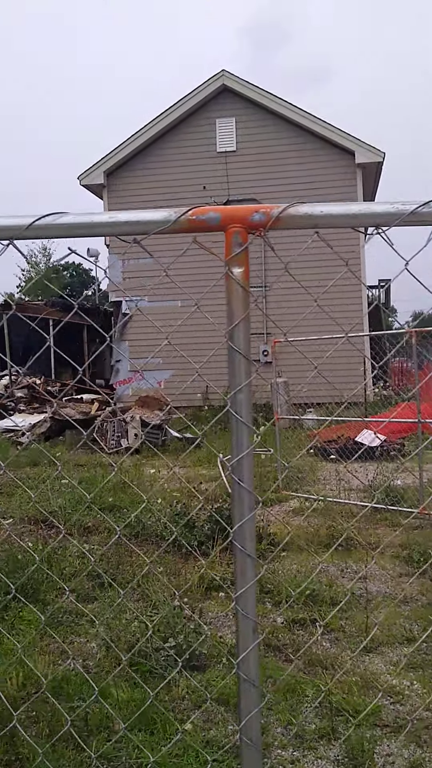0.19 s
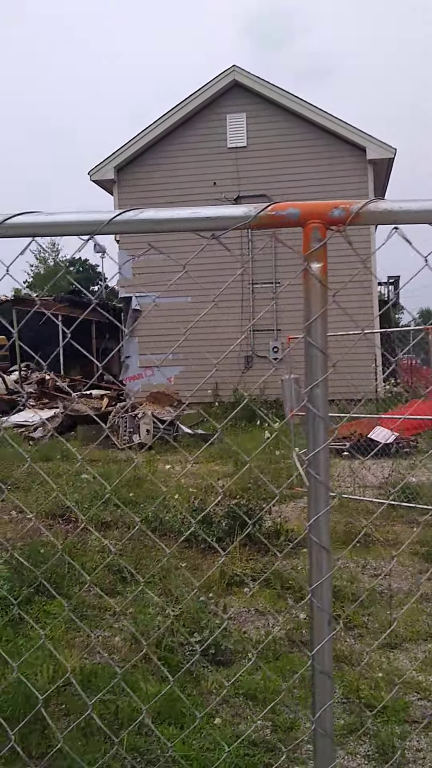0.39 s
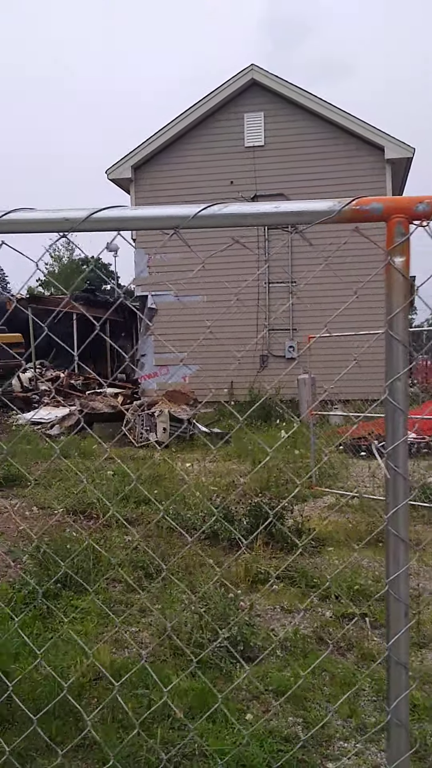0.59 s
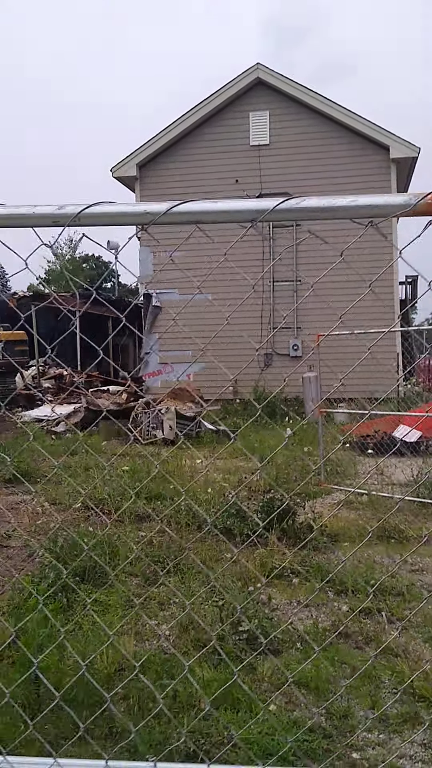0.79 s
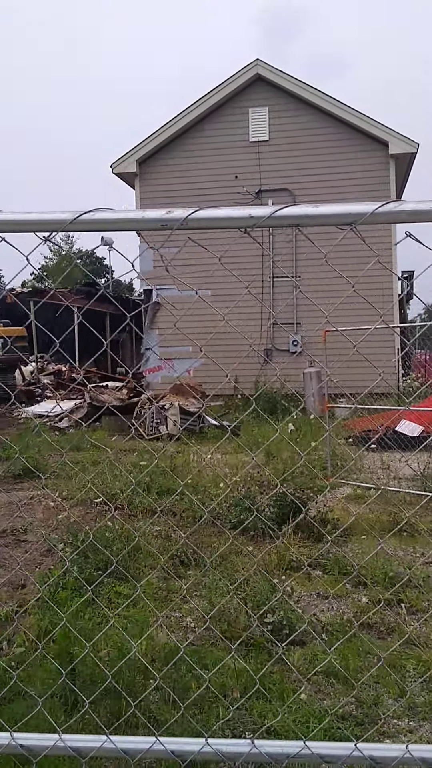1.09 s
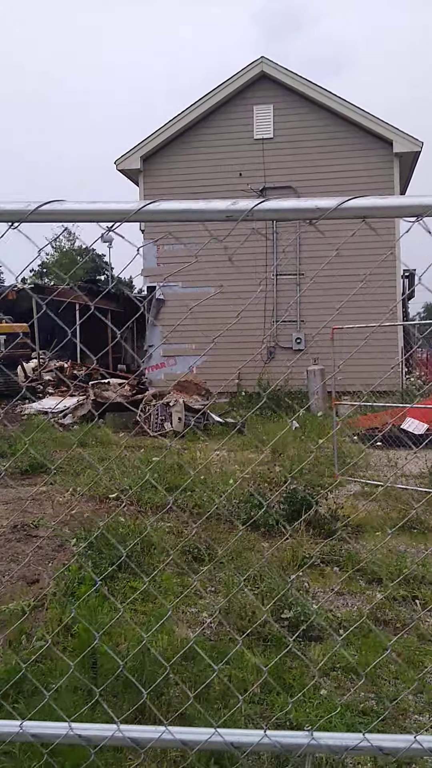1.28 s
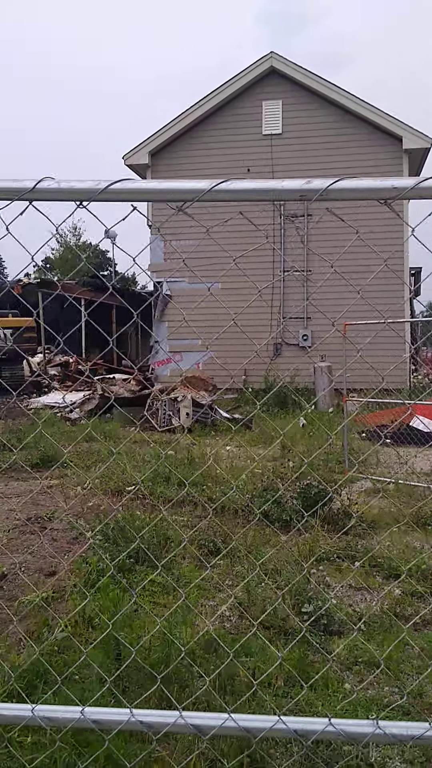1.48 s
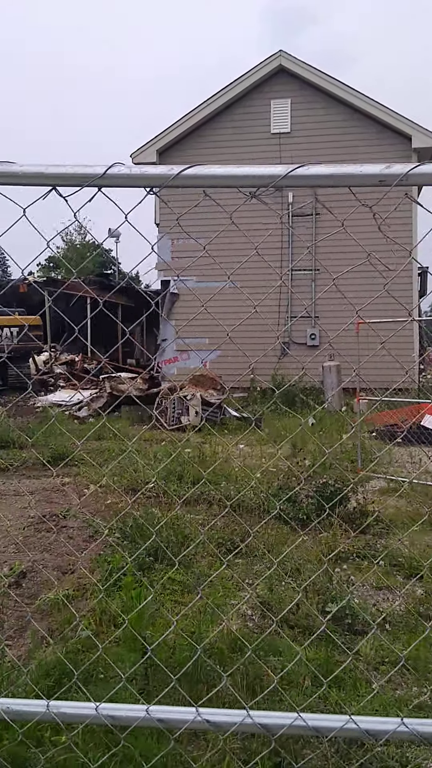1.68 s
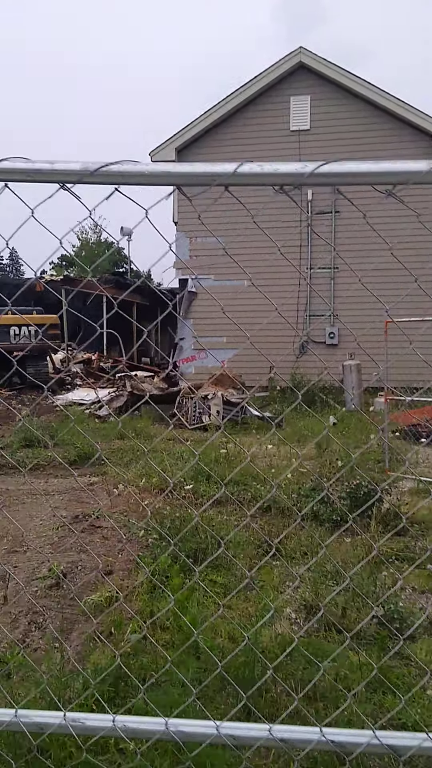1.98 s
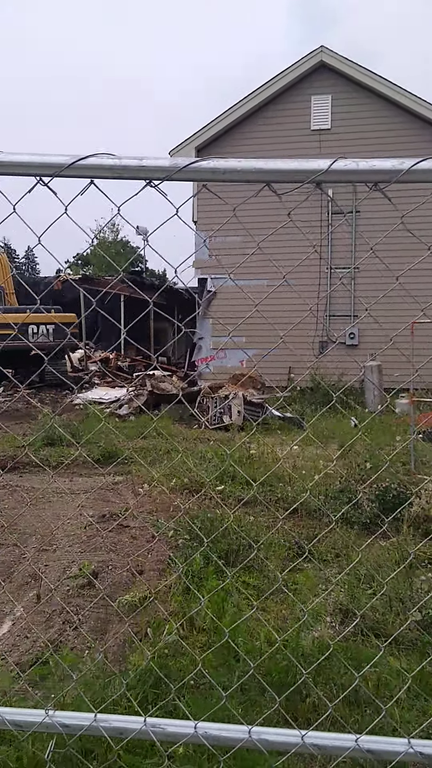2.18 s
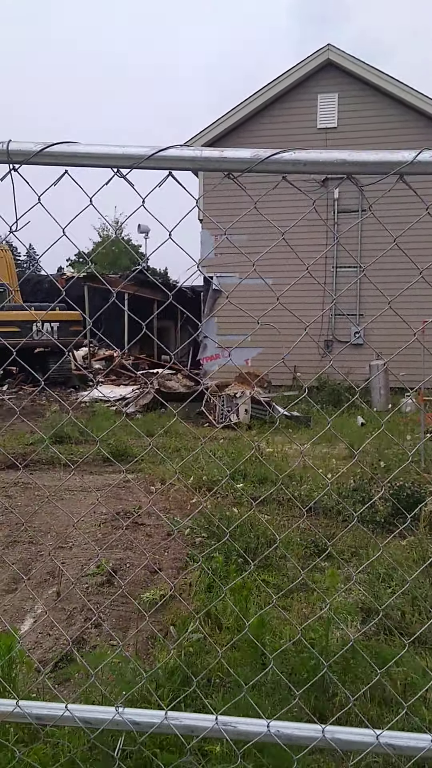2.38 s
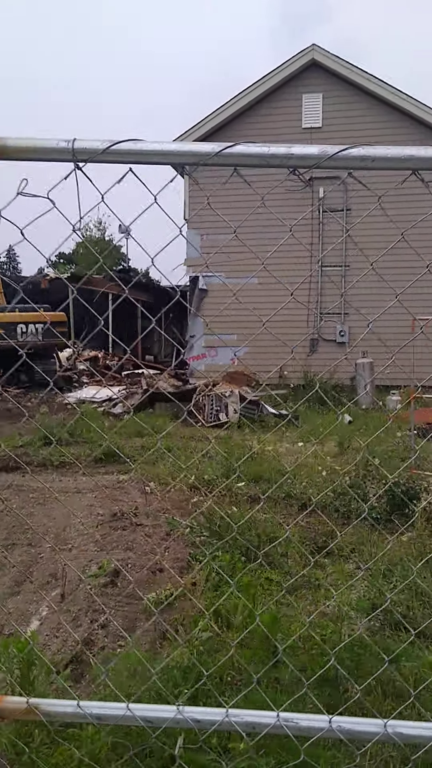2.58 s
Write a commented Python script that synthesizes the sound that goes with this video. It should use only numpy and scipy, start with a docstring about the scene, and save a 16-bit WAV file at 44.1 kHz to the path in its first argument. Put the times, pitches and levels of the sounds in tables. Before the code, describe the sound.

Wooden rubble crunches and slides from about 0.2 seconds, with sharp knocks around 0.8. At 1.2 a quick run of blows on a panel makes one hollow thud, followed by bright crackling and a few pings until 1.7. After a brief lull, more debris clatters from 2.0 to 2.8, each burst echoing briefly. A distant excavator's low diesel hum and a faint outdoor rumble and hiss continue throughout.

```python
"""An open yard, heard through a small two-port microphone; a diesel excavator hums in the distance.
Loose rubble crunches, slides and clatters: dense grains of impact ring in the pieces, and short,
shifting rings colour the crunch. One hollow thud, a quick run of blows on a panel, stands out with
a few knocks and pings from single pieces. Walls and ground return a short echo of the debris.
Under it all lies a steady outdoor rumble and hiss."""
import sys
import numpy as np
from scipy import signal
from scipy.fft import rfft, irfft
from scipy.io import wavfile
from scipy.ndimage import uniform_filter1d

SR = 44100
rng = np.random.default_rng(int(sys.argv[2]) if len(sys.argv) > 2 else 0)


def to_wav(sig):
    """Store sig (one row per channel, or 1-D mono) as 16-bit WAV at the path in sys.argv[1].

    Samples outside -1..1 are clipped; the rate is SR.
    """
    pcm = np.clip(np.atleast_2d(sig), -1, 1) * 32767
    pcm = np.round(pcm).astype(np.int16)
    wavfile.write(sys.argv[1], SR, pcm.T)  # frames by channels


N = 121275


def gain_of(db):
    """Decibels to amplitude gain."""
    return 10 ** (np.asarray(db) / 20)


def unit_rms(x):
    """Scales to rms 1."""
    return x / np.sqrt(np.mean(x ** 2) + 1e-20)


def curve_at(points, hz):
    """Reads (f/Hz, value) points on a log-frequency axis."""
    f, value = np.transpose(points)
    return np.interp(np.log(hz + 1), np.log(f + 1), value)


def high_pass(x, hz):
    """Rolls off the bass below hz."""
    return signal.sosfilt(signal.butter(3, hz, "high", fs=SR, output="sos"), x)


def drift(top_hz, points, length=N):
    """Random wander of rms about 1: sines up to top_hz, drawn on `points` steps, stretched to length."""
    t = np.arange(points) * N / SR / points
    rates = np.geomspace(top_hz / 10, top_hz, num=20)
    wander = unit_rms(sum(np.sin(2 * np.pi * (f * t + rng.random())) / np.sqrt(f) for f in rates))
    return np.interp(np.arange(length), np.linspace(0, length - 1, points), wander)


def microphone_ports(a, b, hz, likeness, balance):
    """Mixes two unrelated spectra into partly alike left and right ports; the right hears later."""
    lag_s = .00008
    shared = np.clip(curve_at(likeness, hz), 0, 1)
    side = gain_of(curve_at(balance, hz) / 2)
    left = a * side * np.exp(2j * np.pi * hz * lag_s)
    right = (shared * a + np.sqrt(1 - shared ** 2) * b) / side
    return np.array([left, right]) * 2 / (side + 1 / side)


def background_air():
    """Steady outdoor rumble and hiss, with a 2 kHz microphone resonance on the right."""
    # spectrum of the noise floor: f/Hz, relative level/dB
    spectrum = [(30, -9), (45, -32), (85, -14.5), (140, -6), (250, -8), (290, -16), (520, -24.5),
                (760, -15), (1000, -24.5), (1490, -19.5), (1700, -18.5), (1900, -1.5), (2300, -9),
                (2600, -34.5), (3440, -32), (4750, -38), (7700, -36.5), (10000, -35.5), (14000, -43),
                (15500, -43)]
    # likeness of the ports: f/Hz, coherence
    likeness = [(60, 1.0), (180, 1), (550, 1), (1650, 0.55), (4970, 0.02), (15000, 0.05)]
    # balance: f/Hz, left over right/dB
    balance = [(60, -6.5), (120, 8.5), (240, 1.5), (480, 6), (950, -1.5), (1890, -30.5), (3770, -4),
               (7520, 1.5), (15000, 8)]
    level_db, patch_db, swell_db = -50, 2.5, .6
    frames, hz = N // 256 + 5, np.fft.rfftfreq(1024, 1 / SR)
    a, b, c, d, patches = rng.standard_normal((5, frames, 513))
    patches = unit_rms(uniform_filter1d(uniform_filter1d(patches, size=10, axis=0), size=10, axis=1))
    swell = drift(5.46, frames, length=frames)[:, None]
    noise = microphone_ports(a + 1j * b, c + 1j * d, hz, likeness, balance)
    noise *= gain_of(curve_at(spectrum, hz) + patch_db * patches + swell_db * swell)
    air = signal.istft(noise.transpose(0, 2, 1), nperseg=1024, noverlap=768)[1][:, :N]
    return gain_of(level_db) * unit_rms(air)


def excavator_hum():
    """The distant diesel: low tones of steady level, each wavering slightly in pitch."""
    # engine tones: f/Hz, rms level/dB
    tones = [(59.2, -62.5), (101.5, -61), (118, -64.5), (170, -70), (200.5, -64.5), (235, -75),
             (252.5, -69), (469, -78)]
    waver_share, hum = .0061, 0
    for hz, db in tones:
        pitch_hz = hz * (1 + waver_share * drift(16, points=600))
        cycles = np.cumsum(pitch_hz) / SR + rng.random()
        hum += np.sqrt(2) * gain_of(db) * np.sin(2 * np.pi * cycles)
    return hum


def yard_echo(x):
    """Echoes off walls and ground: sparse taps, each band dying at its own speed; little bass returns."""
    # decay of the yard: f/Hz, t60/s
    decay = [(300, 0.18), (1500, 0.59), (5000, 0.59), (14000, 0.21)]
    echo_db = -12.5
    taps = np.zeros((2, SR))
    arrivals = np.arange(400, SR - 20, 20) + rng.integers(0, 20, (2, (SR - 401) // 20))
    np.put_along_axis(taps, arrivals, rng.choice([-1., 1.], arrivals.shape), 1)
    hz, t, spectra = signal.stft(taps, SR, nperseg=256)
    tail = signal.istft(spectra * gain_of(-60 * t / curve_at(decay, hz)[:, None]), SR, nperseg=256)[1]
    tail /= np.linalg.norm(tail[0])
    return gain_of(echo_db) * signal.fftconvolve(high_pass(x, hz=350), tail, axes=1)[:, :N]


def struck_mode(start_s, db, hz, t60, rise_s, shimmer=0):
    """One dying mode; any shimmer in its level grows over the first 25 ms."""
    t = np.maximum(np.arange(N) / SR - start_s, 0)
    attack = np.sin(np.pi / 2 * np.minimum(t / rise_s, 1)) ** 2
    flutter = 1 + shimmer * np.minimum(t / .025, 1)
    return gain_of(db - 60 * t / t60) * attack * flutter * np.sin(2 * np.pi * hz * t)


def pings():
    """Single struck pieces ring and shimmer as they die."""
    # ringing pieces: t/s, level/dB, f/Hz, t60/s
    strikes = [(0.004, -64, 3980, 0.2), (0.046, -51.5, 4300, 0.15), (0.055, -55.5, 6500, 0.078),
               (0.678, -47.5, 538, 0.17), (0.54, -52, 4300, 0.12), (0.79, -32.5, 2240, 0.054),
               (0.79, -47, 4250, 0.068), (0.793, -32.5, 1690, 0.074), (0.816, -32.5, 3900, 0.024),
               (0.817, -30, 1840, 0.045), (0.88, -58, 3110, 0.51), (0.902, -53, 3110, 0.3),
               (0.9, -34, 1733, 0.1), (0.901, -38, 4050, 0.023), (0.936, -65, 9550, 0.42),
               (0.968, -49.5, 3120, 0.067), (1.354, -43, 2076, 0.65), (1.4, -41, 1304, 0.32),
               (1.42, -50.5, 537, 0.15), (1.537, -24, 6550, 0.033), (1.577, -43.5, 556, 0.067),
               (2.017, -37.5, 2110, 0.064), (2.018, -48, 3530, 0.063), (2.038, -42, 2056, 0.03),
               (2.07, -60, 4800, 0.035), (2.071, -42, 2940, 0.074), (2.214, -29.5, 1025, 0.097),
               (2.218, -33, 2880, 0.048), (2.38, -49, 1008, 0.2), (2.422, -24.5, 3390, 0.031),
               (2.422, -28, 2543, 0.031), (2.462, -33.5, 599, 0.15), (2.463, -34.5, 693, 0.13),
               (2.465, -38.5, 801, 0.12), (2.644, -42.5, 980, 0.1)]
    shimmer = .7 * drift(140, points=2000)
    return sum(struck_mode(*strike, rise_s=.0025, shimmer=shimmer) for strike in strikes)


def panel_thud():
    """Quick blows ring the modes of a hollow panel, which radiates little bass."""
    # blows: t/s, level/dB
    blows = [(1.1665, -26), (1.192, -29), (1.2175, -45), (1.289, -50)]
    # panel modes: f/Hz, relative level/dB, t60/s
    modes = [(163, -9, .1), (196, 2.5, .11), (474, -3, .14), (548, -13, .28)]
    thud = sum(struck_mode(start_s, db + mode_db, hz, t60, rise_s=.005)
               for start_s, db in blows for hz, mode_db, t60 in modes)
    return high_pass(thud, hz=140)


def clatter_power():
    """Power in the six rubble bands as pieces land: a fast rise, then each band's own decay."""
    # clatters: t/s, level/dB, offsets/dB of the low, woody, body, edge, fizz and top bands, base t60/s
    clatters = [(0.0044, -40, -36, -24, -10, -15, -26.5, -22, 0.77),
                (0.233, -36, -30, -10.5, -7.5, -32, -21, -25, 0.56),
                (0.238, -27, -30, -19.5, -11, -27, -29, -36, 0.52),
                (0.2731, -31, -19, -28, -11, -29, -31, -23, 0.3),
                (0.3004, -19.5, -24, -14, -11.5, -23, -17, -18.5, 0.31),
                (0.3224, -23, -25, -17, -13, -13, -20, -19.5, 0.47),
                (0.411, -26.5, -27, -10, -15, -16, -24, -21, 0.41),
                (0.5148, -27.5, -33, -23, -13.5, -10.5, -15.5, -20, 0.71),
                (0.6234, -24, -40, -37, -15, -10, -20.5, -35, 0.21),
                (0.79, -31, -35.5, -31, -12, -23, -49, -65, 0.24),
                (0.816, -33, -56, -18, -12, -12, -50, -53, 0.32),
                (0.849, -44.5, -39, -21, -9.5, -15, -44, -43, 0.67),
                (0.9016, -33.5, -40, -20, -22.5, -15, -32.5, -39, 0.18),
                (1.1657, -30.5, -16, -40, -21.5, -10.5, -5.5, -4, 0.18),
                (1.1815, -27.5, -18, -21, -10, -10, -17, -20, 0.46),
                (1.207, -26.5, -29, -8, -12, -31, -16, -18, 0.18),
                (1.26, -28, -22, -22, -20, -16.5, -15.5, -6.5, 0.29),
                (1.352, -24.5, -44, -47, -24, -14, -15, -14, 0.16),
                (1.389, -34.5, -36, -36, -44, -14.5, -8, -16, 0.45),
                (1.468, -33.5, -39, -50, -41, -34, -9.5, -6.5, 0.49),
                (1.518, -26.5, -39, -29, -12, -12, -8.5, -11.5, 0.24),
                (1.5352, -25.5, -51, -12.5, -8, -37, -10, -26, 0.3),
                (1.5664, -22.5, -41.5, -23, -13, -18, -19, -30, 0.36),
                (1.6136, -21, -40, -25, -11.5, -5.5, -10.5, -28, 0.061),
                (1.64, -30.5, -44, -31, -12, -16.5, -23.5, -52, 0.65),
                (1.808, -42, -48, -23, -5.5, -38, -48, -34, 0.33),
                (2.0138, -39.5, -37, -34, -21, -7.5, -37, -40, 0.58),
                (2.069, -46.5, -39, -39, -15, -11.5, -29, -33, 1),
                (2.1855, -29.5, -42, -25.5, -12.5, -7.5, -20, -45, 0.39),
                (2.212, -22.5, -52, -21, -10, -7, -24, -54, 0.15),
                (2.366, -35.5, -31.5, -18, -19, -7.5, -34, -48, 0.14),
                (2.4197, -30.5, -50, -33, -11.5, -8, -13.5, -27, 0.14),
                (2.4607, -36, -28, -15, -3.5, -9, -14, -24, 0.12),
                (2.4855, -43, -31, -22, -14, -2.5, -31, -30, 0.36),
                (2.644, -37.5, -44, -32, -5.5, -19, -13, -24, 0.19),
                (2.7403, -37, -38, -17, -4.5, -11, -39, -48, 0.17)]
    rise_s, t60_share = .005, np.c_[[.44, .29, .58, .27, .44, .36]]
    power = np.zeros((6, N))
    for start_s, db, *bands_db, t60 in clatters:
        first = round(start_s * SR)
        span = np.arange(first, min(first + SR // 2, N))
        age = np.maximum(span / SR - start_s, 0)
        fall_db = db + np.c_[bands_db] - 60 * age / (t60 * t60_share)
        power[:, span] += (np.minimum(age / rise_s, 1) * gain_of(fall_db)) ** 2
    return power


def slide_power():
    """Power in the rubble bands as the heap slides between clatters; the low band stays empty."""
    # one path per slide: t/s, body level/dB, offsets/dB of the woody, edge, fizz and top bands
    slides = [
        [(0.21, -68, -34, -30, -18, -16), (0.228, -52, -11, 0.5, 1.5, 0), (0.318, -52.5, 17, 12, 4.5, -8),
         (0.4, -39, -10, -5, -4, -7.5), (0.648, -54.5, -5, 3, -7.5, -30), (0.788, -58, -37, -32, -44, -49)],
        [(1.17, -56, -3, 8.5, 1.5, -4), (1.352, -50, -18, -11.5, -4, -5.5), (1.506, -55, -40, -4, 3.5, 8),
         (1.536, -49, 9.5, 9, 7, 7), (1.742, -60, -33, -7.5, -25, -32), (1.934, -59, -33, -10, -29, -33),
         (1.95, -70, -13, -37, -33, -40)],
        [(2.18, -52.5, -22, 4, -10, -14), (2.204, -50.5, -1, 3, -8.5, -18.5),
         (2.366, -52, -23, -17, -29.5, -25.5), (2.462, -55.5, -10, 11, -0.5, -40),
         (2.616, -59.5, -33, -7.5, -32, -28), (2.64, -58.5, -0.5, 6.5, -7.5, 0.5),
         (2.74, -66, -21, -3, -16, -33)],
    ]
    t, power = np.arange(N) / SR, np.zeros((6, N))
    for slide in slides:
        times, body_db, woody_db, *upper_db = np.transpose(slide)
        for band, offset_db in enumerate([woody_db, 0, *upper_db], start=1):
            power[band] += gain_of(np.interp(t, times, body_db + offset_db, left=-120, right=-120)) ** 2
    return power


def grains():
    """Tiny impacts of random size and sign, bunching into louder clumps."""
    per_second, spread_db, clump_db = 5000, 3, 1.9
    size = gain_of(spread_db * np.minimum(rng.exponential(1, (2, N)), 3.5))
    hits = rng.random((2, N)) < per_second / SR
    clicks = unit_rms(size * hits * rng.choice([-1., 1.], (2, N)))
    return clicks * gain_of(clump_db * drift(70, points=2000))


def shifting_rings(crunch, sets=13):
    """Short, randomly pitched rings that keep changing and colour the crunch."""
    turn_s, mean_t60_s = .035, .038
    bare_db, ring_db, spread_db = -7, 2.5, 3
    t, turn, ringing = np.arange(4000) / SR, np.arange(N) / SR / turn_s, 0
    for k in range(sets):
        place, size, life = rng.random((3, 55, 1))  # 55 rings a set
        hz = 350 + 14650 * place ** 1.2
        fall_db = -spread_db * np.log(size) - 60 * t / (mean_t60_s * (.5 + life))
        rings = (gain_of(fall_db) * np.sin(2 * np.pi * hz * t)).sum(0)
        crossfade = np.cos(np.pi / 2 * np.clip((turn - k) % sets - 1, -1, 1))
        ringing += signal.oaconvolve(crunch * crossfade, rings[None] / np.linalg.norm(rings), axes=1)
    return gain_of(bare_db) * crunch + gain_of(ring_db) * ringing[:, :N]


def rubble():
    """Dense grains, driven band by band by clatters and slides, ring in the pieces."""
    # colour within the bands: f/Hz, relative level/dB
    spectrum = [(300, -17), (450, -9.5), (600, -8.5), (740, -14), (950, 1.5), (1600, 3), (2200, 4),
                (2800, -3.5), (3600, -6), (4800, -9.5), (6500, -10), (9500, -15.5), (12500, -23.5),
                (15500, -30.5)]
    # resonances of the pieces: f/Hz, bandwidth/Hz
    resonances = [(480, 150), (988, 6.3), (1203, 27), (1657, 580), (2150, 81), (2424, 15), (2890, 910),
                  (3740, 37), (4360, 15), (5720, 43)]
    # edges of the six bands, low to top: f/Hz
    band_edges = [270, 690, 1250, 2600, 4700, 9000, 16500]
    # likeness of the ports: f/Hz, coherence
    likeness = [(300, 0.8), (700, 0.71), (1400, 0.63), (2400, 0.89), (4000, 0.22), (8000, 0.063),
                (15000, 0.11)]
    # balance: f/Hz, left over right/dB
    balance = [(300, -2.5), (700, 2), (1300, -2.5), (1900, -5), (2500, -4), (3500, 3), (7000, 4),
               (14000, 10)]
    ring_gain, overlap = 2 * gain_of(-9), .18  # bands overlap in natural-log frequency
    hz = np.fft.rfftfreq(N, 1 / SR)
    rings = sum(ring_gain / (1 + 2j * (hz - f) / max(width, 15)) for f, width in resonances)
    colour = gain_of(curve_at(spectrum, hz)) * (1 + rings)
    impacts, crunch = grains(), 0
    for k, power in enumerate(clatter_power() + slide_power()):
        lower, upper = (np.clip(.5 + np.log((hz + 1) / f) / overlap, 0, 1) for f in band_edges[k:k + 2])
        band = colour * (np.sin(np.pi / 2 * lower) * np.cos(np.pi / 2 * upper)) ** 2
        band /= np.sqrt(np.mean(abs(band) ** 2))
        crunch += irfft(rfft(impacts * np.sqrt(power)) * band, N)
    return irfft(microphone_ports(*rfft(shifting_rings(crunch)), hz, likeness, balance), N)


def scene():
    """Debris and its echo in the yard, over the distant excavator and the background air."""
    debris = rubble() + pings() + panel_thud()
    return debris + yard_echo(debris) + excavator_hum() + background_air()


def record(dry):
    """The microphone's band ends steeply in the top treble."""
    edge_hz = 15750
    low_pass = signal.firwin(2047, edge_hz, window=("kaiser", 9), fs=SR)
    return signal.oaconvolve(dry, low_pass[None], "same")


dry = scene()
out = record(dry)
to_wav(out)
```